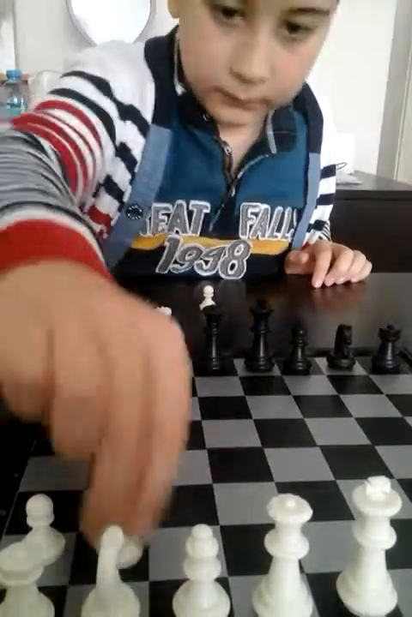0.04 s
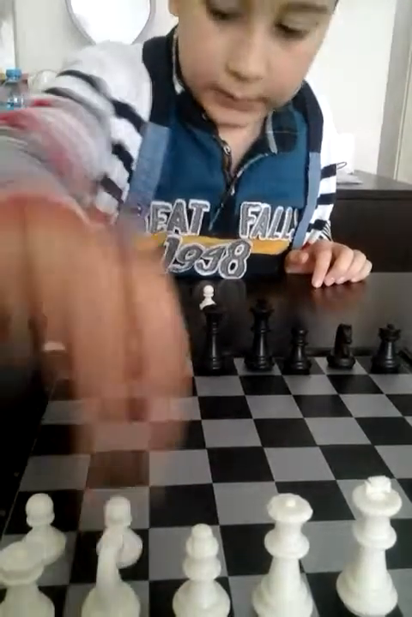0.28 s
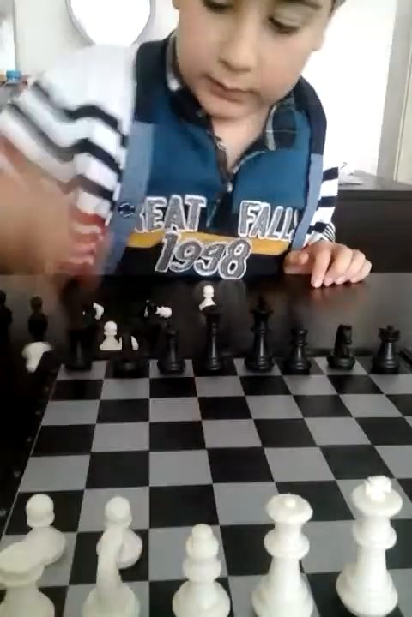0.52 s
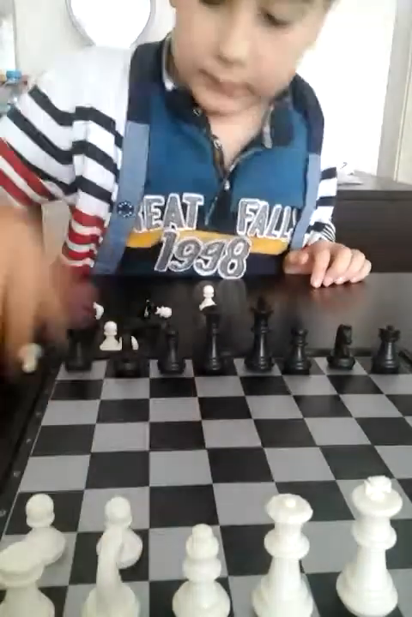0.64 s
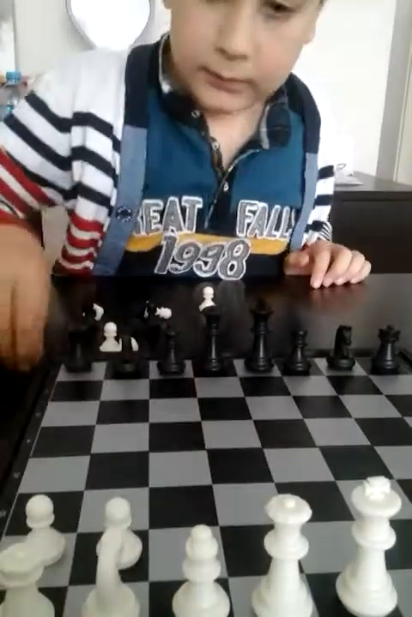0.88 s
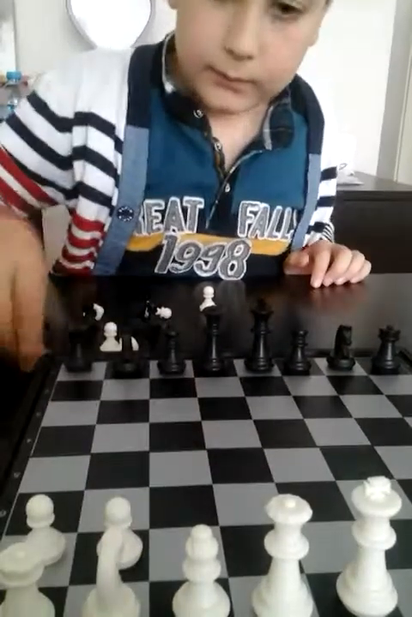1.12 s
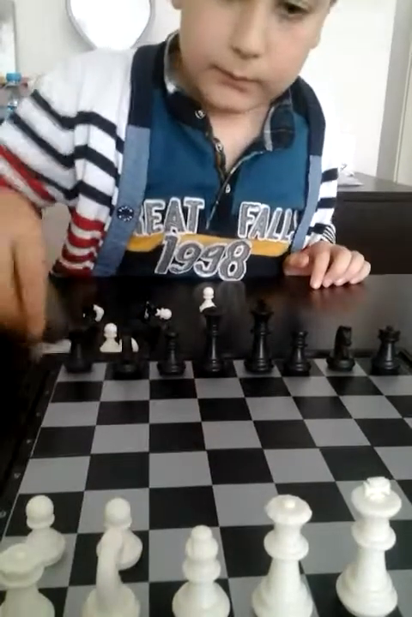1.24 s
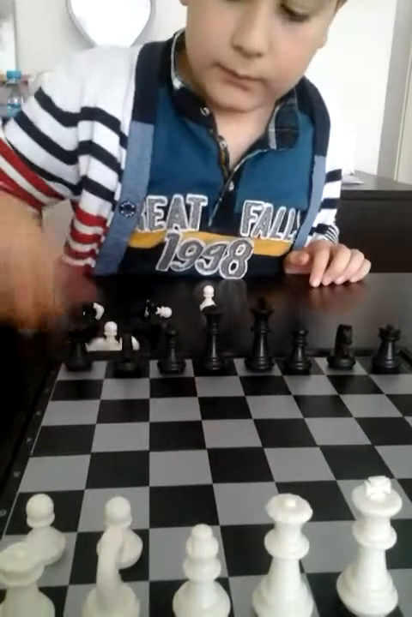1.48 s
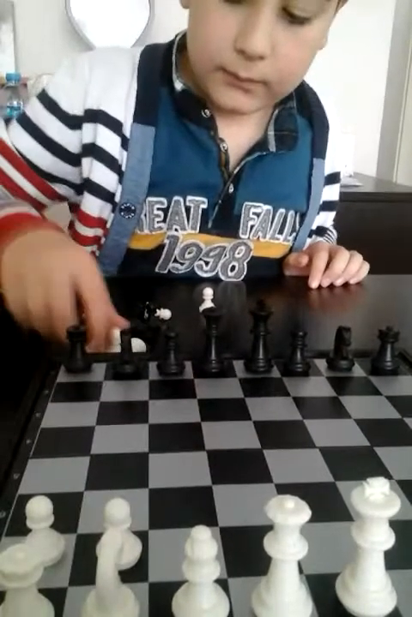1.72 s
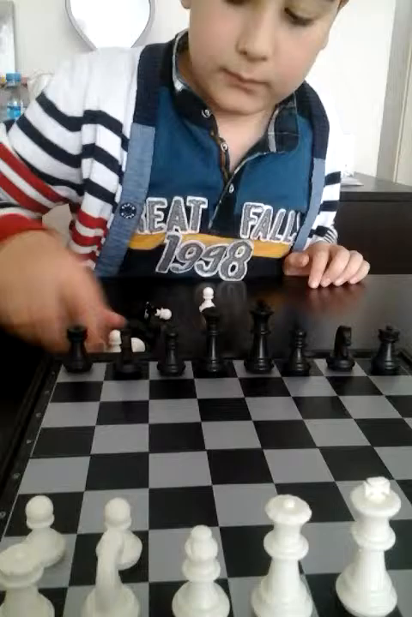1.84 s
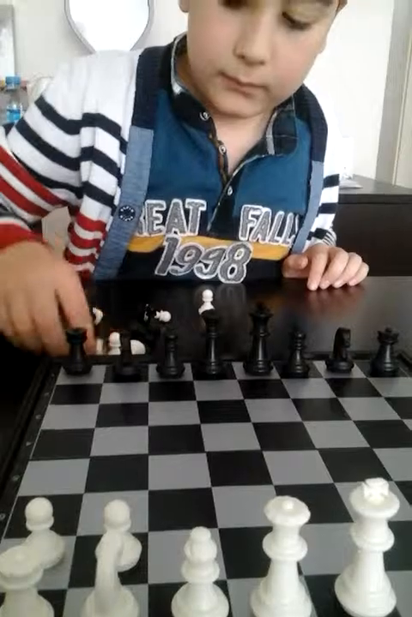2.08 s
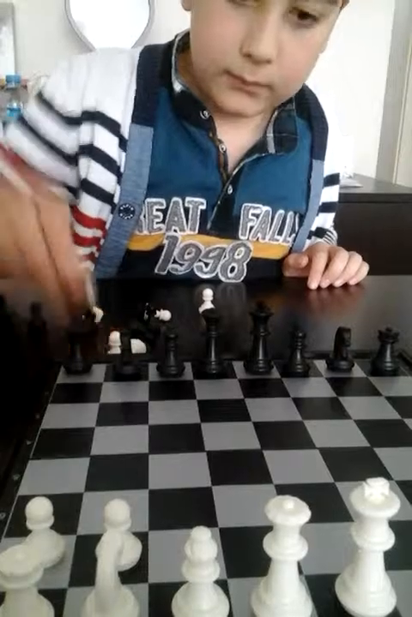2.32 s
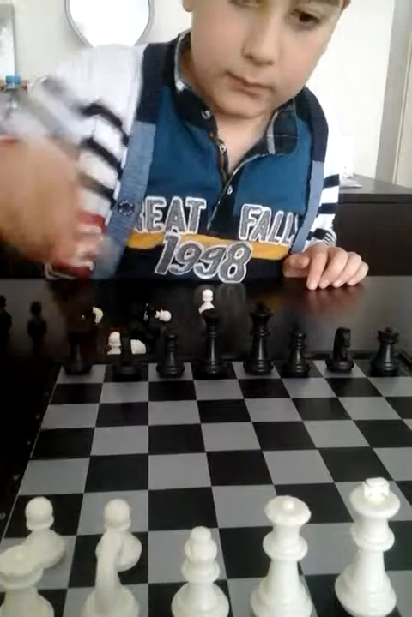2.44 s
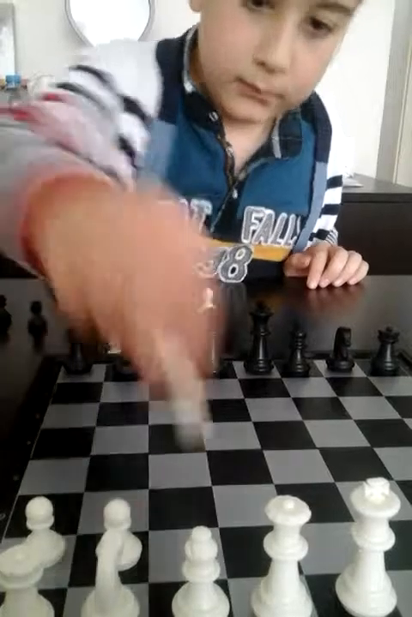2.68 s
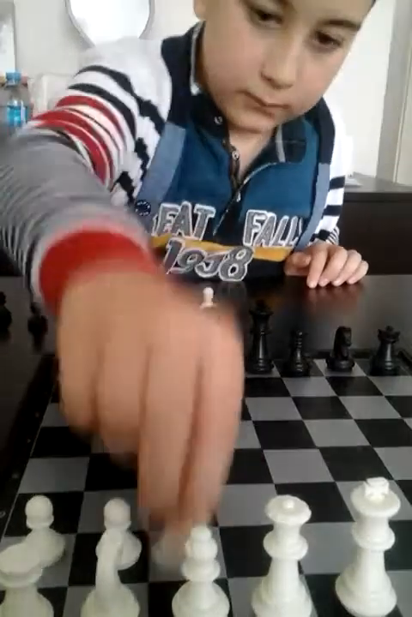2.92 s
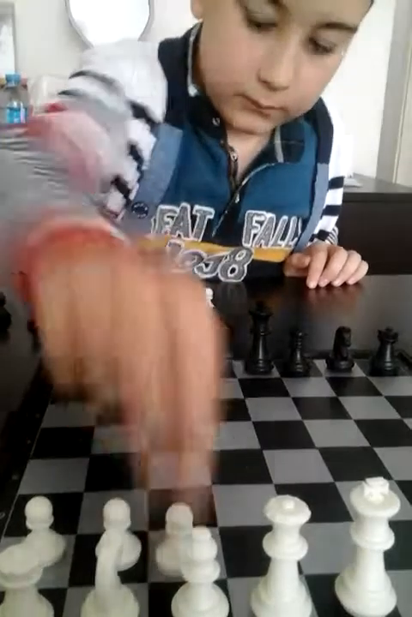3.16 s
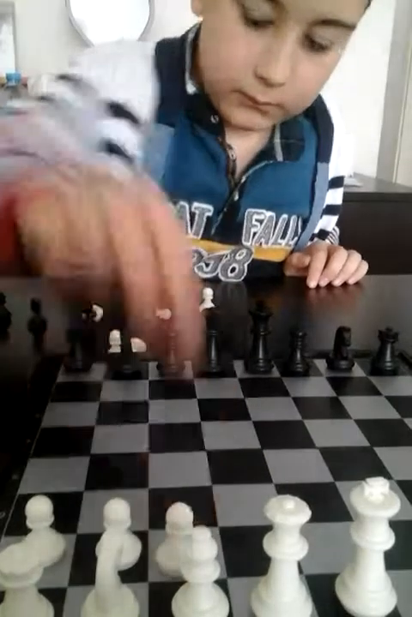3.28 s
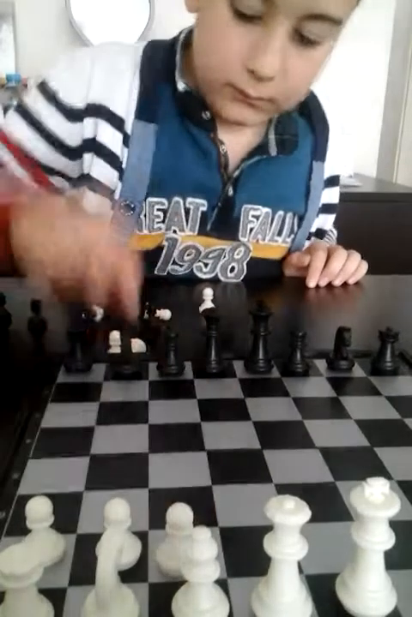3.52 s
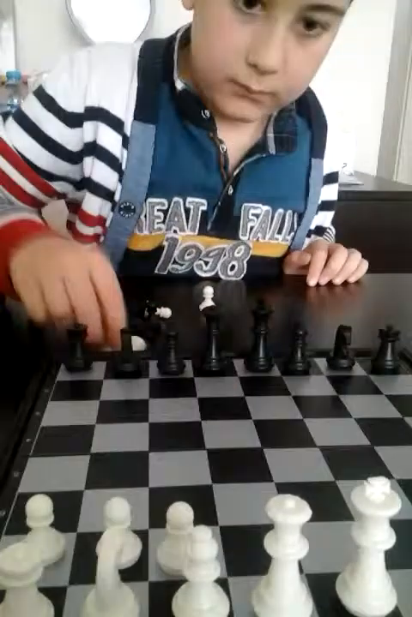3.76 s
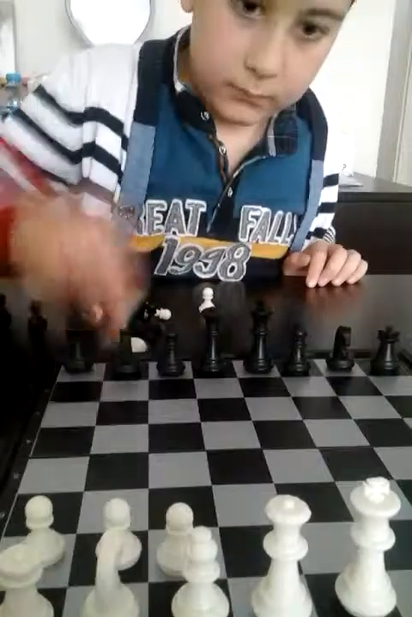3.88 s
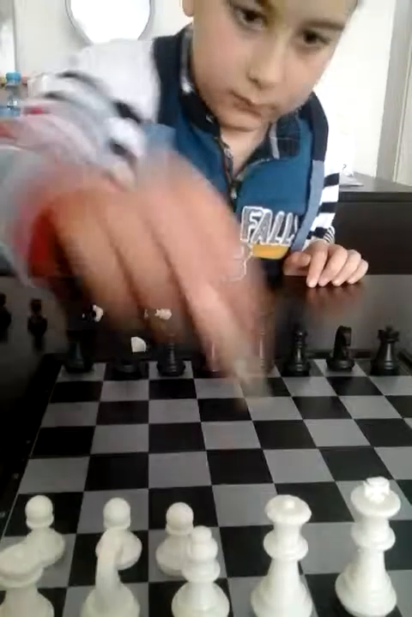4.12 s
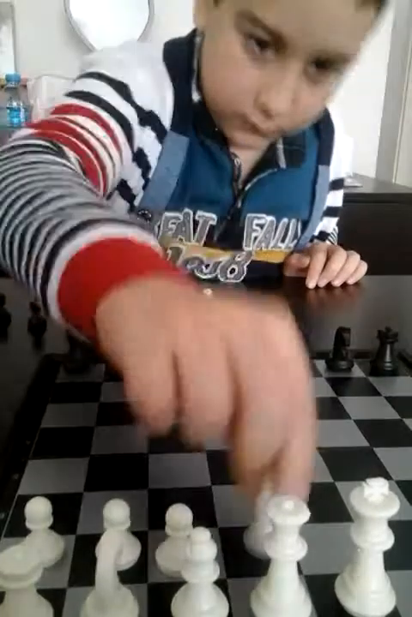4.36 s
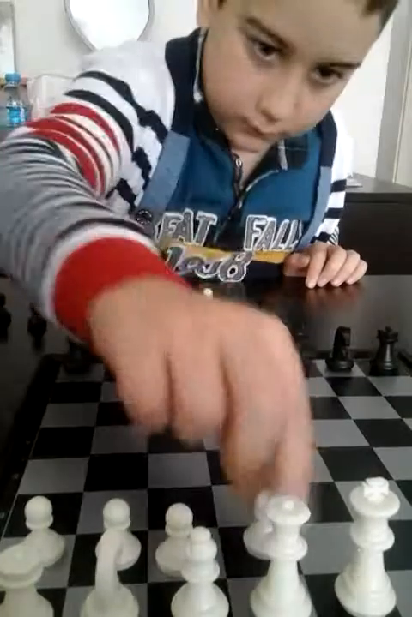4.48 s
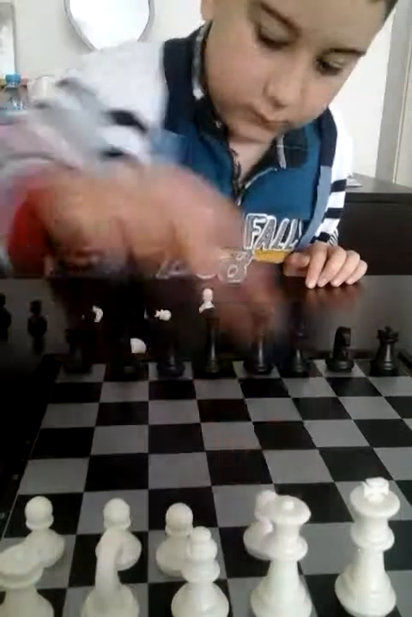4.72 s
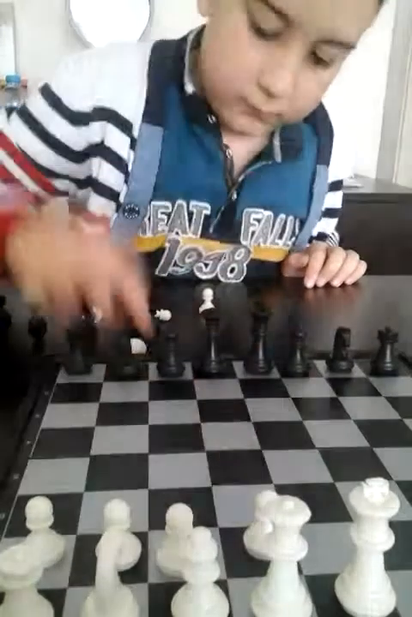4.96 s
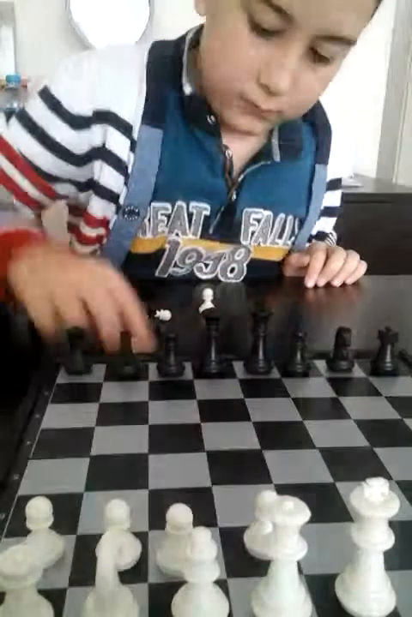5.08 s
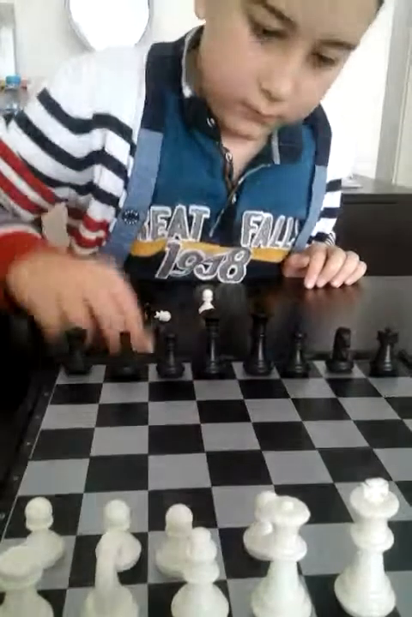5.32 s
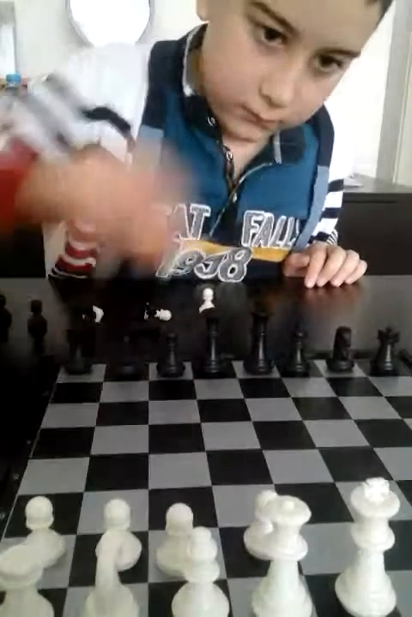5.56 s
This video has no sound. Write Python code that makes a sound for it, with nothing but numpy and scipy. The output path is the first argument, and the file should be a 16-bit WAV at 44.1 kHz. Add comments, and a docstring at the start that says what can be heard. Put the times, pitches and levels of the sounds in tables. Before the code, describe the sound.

Sharp, hollow clicks of plastic chess pieces being placed, with one falling, bouncing and rolling briefly across a table.

```python
"""A small room, a phone's two microphone ports close beside a chessboard on a table.
Hollow plastic pieces are set down on the near squares; every contact rings a piece briefly.
At the far end a hand picks among the spares; one slips, topples, bounces and rolls to rest.
Ceiling and walls answer, over a faint sleeve rustle and a quiet room hum."""
import sys
import numpy as np
from scipy import signal
from scipy.fft import rfft, irfft
from scipy.io import wavfile
from scipy.ndimage import uniform_filter1d

SR = 44100
rng = np.random.default_rng(int(sys.argv[2]) if len(sys.argv) > 2 else 0)


def persist_wave(psi):
    """Save psi, clipped to +-1, as 16-bit WAV."""
    counts = np.round(np.clip(psi, -1, 1) * 32767).astype(np.int16)
    wavfile.write(sys.argv[1], SR, np.atleast_2d(counts).T)


N = 246871
T = np.arange(N) / SR
SIDES = np.array([[.5], [-.5]])  # shares a left-minus-right difference between the channels

# broad colour of a contact between its resonances, near and far: frequency_hz, level_db
NEAR_CRACK = [(100, -31), (350, 1.5), (700, -4.5), (1500, 3), (3000, -5), (5800, -10.5), (7000, -15.5),
              (12000, -20.5), (15000, -37)]
FAR_CRACK = [(100, -26.5), (200, -4.5), (400, -2), (800, -2.5), (1250, 6), (2200, 3), (3600, 1.5),
             (5400, -5.5), (6800, -10.5), (8500, -22.5), (12000, -28.5), (15000, -58)]


def placings():
    """Pieces land on their squares right by the microphone; a smaller piece rings higher."""
    # start_s, level_db, bass_db, treble_db, left_minus_right_db, pitch_factor
    landings = [(0.1115, -29, -7, 5, 0.5, 0.98), (0.1243, -37.5, 1, -11, 0.5, 1.06),
                (0.2076, -47, 7, 6.5, 3, 0.88), (.2705, -56.5, -6, 35, 7, 1.1),
                (3.0201, -31.5, 7, 3, 5, 1.06), (3.0374, -31.5, 6.5, 5, -1.5, 1.034),
                (3.0485, -48, 6, -1, -11, 1.33), (4.4732, -29.5, -5, -8.5, 1.5, 1.044)]
    # resonances of a hollow piece: pitch_hz, base_width_hz, level_db
    piece_modes = [(697, 64, 3), (956, 56, 1.5), (1258, 74, 2), (1690, 58, -6), (2210, 250, -6),
                   (3380, 170, -8.5), (4110, 260, -7), (5200, 160, -4.5), (8150, 190, -17),
                   (12150, 400, -14)]
    out = np.zeros((2, N))
    for start_s, level_db, bass_db, treble_db, pan_db, pitch in landings:
        modes = np.array(piece_modes) * [pitch, 1, 1]
        click = contact(modes, NEAR_CRACK, crack_db=-6, contact_s=0.0021, damping=2.1,
                        bass_db=bass_db, treble_db=treble_db)
        add(out, start_s, click * undb(level_db + pan_db * SIDES))
    return out


def ticks():
    """On the near squares a piece brushes its neighbour and rings with a short tick."""
    # start_s, level_db, pitch_hz, treble_db
    brushes = [(0.334, -41, 2100, 5.5), (3.16, -47.5, 1860, -12), (3.2003, -43, 1720, 1.5)]
    # resonances of a tick: pitch_multiple, base_width_hz, level_db
    tick_modes = [(1, 100, 6), (1.7, 100, -4), (2.5, 140, -15), (3.45, 90, -14)]
    out = np.zeros(N)
    for start_s, level_db, pitch_hz, treble_db in brushes:
        modes = np.array(tick_modes) * [pitch_hz, 1, 1]
        tick = contact(modes, NEAR_CRACK, crack_db=-8, contact_s=0.00059, damping=5.2,
                       treble_db=treble_db)
        add(out, start_s, tick * undb(level_db))
    return out


def knocks(free_fall_db=-14):
    """Pieces knock on the far end of the table, loudest where one falls and bounces."""
    # start_s, level_db, treble_db
    blows = [(.877, -36, 2.5), (1.0299, -31.5, 4.5), (1.2913, -22.5, 5.5), (1.3092, -15.5, 0.5),
             (1.3668, -15.5, -1), (1.401, -18.5, 12), (1.4305, -16, 2.5), (1.4793, -19.5, -1.5),
             (1.4811, -15.5, 9), (1.522, -18, -1), (1.545, -29, 6), (1.5636, -21.5, -0.5),
             (1.5964, -18.5, 1.5), (2.110, -44, -4), (2.1506, -42.5, 6), (2.163, -40, 1.5),
             (3.889, -53, -2), (5.235, -44.5, -7)]
    out = np.zeros(N)
    for start_s, level_db, treble_db in blows:
        # guided by the fingers, a piece lands softer and flatter, with more bass than in free fall
        bass_db = 0.2 * (free_fall_db - level_db)
        add(out, start_s, far_contact(bass_db, treble_db) * undb(level_db))
    return out


def rolling(length_s=.268, rock_hz=33.02, fade_db_per_s=43, dulling_db_per_s=41.5):
    """The fallen piece rolls on its side, its rim bumping, quieter and duller as it slows."""
    out = np.zeros(N)
    add(out, 0, chatter(length_s, bass_db=0, treble_db=0))
    gaps_s = (1 + 0.29 * rng.uniform(-1, 1, 14)) / rock_hz
    for start_s in np.cumsum(gaps_s):
        add(out, start_s, far_contact() * undb(4.5) * (start_s < length_s))
    treble = out - colour(out, [(1250, 0), (4500, -20)])
    out += treble * (undb(2 - dulling_db_per_s * T) - 1)
    return out * undb(-31.5 - fade_db_per_s * T)


def shuffles():
    """Fingers shuffle a piece over the far end; each scrape swells, holds and is let go."""
    # start_s, length_s, level_db
    moves = [(.866, 0.039, -41), (2.026, 0.089, -67.5), (2.106, 0.084, -45.5), (3.797, 0.079, -58.5),
             (4.979, 0.047, -64.5), (5.21, 0.043, -51)]
    out = np.zeros(N)
    for start_s, length_s, level_db in moves:
        scrape = chatter(length_s, bass_db=1, treble_db=-7)
        swell = envelope(T[:len(scrape)], length_s, attack_s=0.0098, release_s=.012)
        add(out, start_s, scrape * swell * undb(level_db))
    return out


def hand_bumps():
    """The hand bumps the far end of the table, which answers with a dull thud."""
    # start_s, level_db
    bumps = [(.797, -35), (0.81, -42.5), (0.843, -45.5), (0.861, -39.5)]
    # resonances of the table: pitch_hz, base_width_hz, level_db
    table_modes = [(214.8, 28, 5), (297.4, 93, 1.5), (485.5, 290, -4), (777, 201.5, -13.5),
                   (1300, 248, -14.5)]
    out = np.zeros(N)
    for start_s, level_db in bumps:
        thud = contact(table_modes, FAR_CRACK, crack_db=-25, contact_s=0.0035, damping=1.84)
        add(out, start_s, thud * undb(level_db))
    return out


def slide(start_s=1.1605, tip_s=1.305, level_db=-43.5):
    """A far piece slides with a thin hiss that swells and holds until it tips over."""
    # the hiss: frequency_hz, level_db
    spectrum = [(1000, -17.5), (4000, -12), (5400, -6.5), (6000, 1), (6500, -4.5), (7200, -20),
                (12000, -24.5), (15000, -36)]
    swell = envelope(T - start_s, tip_s - start_s, attack_s=.085, release_s=0.014)
    return noise(spectrum)[0] * undb(level_db) * swell


def chatter(length_s, bass_db, treble_db, rate_hz=450, scatter_db=5):
    """A rim chatters over the table in dense, uneven contacts; rms one while it moves."""
    size = int(length_s * SR)
    spots = 3  # each spot on the rim has its own sound
    touches = rng.random((spots, N)) < rate_hz / spots / SR
    strengths = undb(scatter_db * rng.standard_normal((spots, N))) * rng.choice([-1, 1], (spots, N))
    sound = sum(signal.fftconvolve(spot[:size], far_contact(bass_db, treble_db))
                for spot in touches * strengths)
    return sound / (sound[:size].std() + 1e-9)


def far_contact(bass_db=0, treble_db=0):
    """A piece meets the bare table top; the spot that is struck shifts the whole ring a little."""
    # resonances of a piece on the table: pitch_hz, base_width_hz, level_db
    piece_modes = [(1134, 170, -7), (1242, 120, -1), (1440, 150, -14), (1703, 76, -1), (2817, 205, -0.5),
                   (3620, 200, -0.5), (3680, 113, -8), (4350, 67, -8), (5300, 300, -6), (6140, 140, -14),
                   (7630, 110, -16.5)]
    modes = np.array(piece_modes) * [1 + 0.028 * rng.standard_normal(), 1, 1]
    return contact(modes, FAR_CRACK, crack_db=-9.5, contact_s=0.003, damping=1.22,
                   bass_db=bass_db, treble_db=treble_db)


def contact(modes, crack_colour, crack_db, contact_s, damping, bass_db=0, treble_db=0):
    """A brief, rough blow rings a body; damping widens its modes. Rms one over the first 5 ms."""
    size = 4096
    f = np.fft.rfftfreq(size, 1 / SR)
    hz, width, db = np.transpose(modes)[:, :, None]
    hz = hz * (1 + 0.029 * rng.standard_normal(hz.shape))  # no two landings ring quite alike
    resonances = np.sum(undb(db) ** 2 / (1 + (2 * (f - hz) / (width * damping)) ** 2) ** 2, axis=0)
    body = np.sqrt(resonances + undb(crack_db + lookup(crack_colour, f)) ** 2)
    # a flat landing brings out the bass, a hard edge the treble
    landing = undb(lookup([(650, bass_db), (1250, 0.0037), (4500, treble_db)], f))
    # the blow is irregular in time but feeds all bands evenly
    blow = rfft(rng.standard_normal(size) * np.exp(-(T[:size] / contact_s) ** 2))
    unevenness = np.sqrt(uniform_filter1d(np.abs(blow) ** 2, size=25))
    # a causal response: nothing rings before the blow
    cepstrum = irfft(np.log(body * landing / unevenness))
    causal = 1 + np.sign(np.fft.fftfreq(size))
    sound = irfft(blow * np.exp(rfft(cepstrum * causal)))
    return sound / sound[:SR // 200].std()


def room(tail_db, ceiling_db, ceiling_s, early_db, early_s, modes_db, alike_hz=900):
    """The room's answer: nearby surfaces, the ceiling echo, a diffuse tail and faint resonances."""
    # time to die away by 60 dB: frequency_hz, decay_s
    decay_times = [(150, 0.616), (500, 0.5), (1300, 0.35), (4000, 0.41), (7000, 0.37), (14000, 0.12)]
    # strongest room resonances: pitch_hz, level_db
    room_modes = [(1211, -51.5), (1362, -42), (1459, -48), (1809, -40), (2024, -57.5), (2848, -49),
                  (3262, -45.5), (3408, -47), (3488, -43.5), (3585, -49), (3903, -58.5), (4290, -51)]
    t = T[:SR * 3 // 4]
    f = np.fft.rfftfreq(len(t), 1 / SR)
    white = rng.standard_normal((2, len(t)))
    tail = ringing = 0
    for hz in np.geomspace(125, 16000, 8):
        octave = lookup([(hz / 2, 0), (hz, 1), (hz * 2, 0)], f)
        # long waves reach both ports by the same paths
        paths = unit(white + white[::-1] / (1 + hz / alike_hz))
        tail += irfft(rfft(paths) * octave, len(t)) * undb(-60 * t / lookup(decay_times, hz))
    for hz, db in room_modes:
        tone = np.sin(2 * np.pi * (hz * t + rng.random((2, 1))))
        ringing += tone * undb(db - 60 * t / lookup(decay_times, hz))
    early = rng.standard_normal((2, len(t))) * np.exp(-t / early_s) * (t > .002)
    ceiling = rng.standard_normal(len(t)) * np.exp(-np.abs(t - ceiling_s) / .0005)
    tail *= np.minimum(t / 0.01, 1)
    layers = [(tail, tail_db), (early, early_db), (ceiling, ceiling_db), (ringing, modes_db)]
    return sum(unit(x) * undb(db) for x, db in layers) / np.sqrt(len(t))


def at_microphone(source, response):
    """The direct wave meets the two ports out of phase; the room follows."""
    # frequency_hz, left_minus_right_rad
    port_phase = [(300, 2.8), (1000, 1.86), (3000, 2.04), (5000, 1.3), (7000, 1.52)]
    turn = np.exp(1j * lookup(port_phase, np.fft.rfftfreq(N, 1 / SR)) * SIDES)
    direct = irfft(rfft(source) * turn, N)
    return direct + signal.fftconvolve(direct, response, axes=-1)[:, :N]


def sleeve(level_db=-74, waver_db=4, waver_hz=9):
    """A sleeve rustles faintly and unevenly as the arm reaches to and fro."""
    # the cloth: frequency_hz, level_db
    spectrum = [(200, -27.5), (350, 0.5), (700, 0), (1200, -5), (2200, -5), (6000, -17.5), (15000, -29.5)]
    steps = rng.standard_normal(200)
    waver = np.interp(T * waver_hz, np.arange(len(steps)), steps)
    return noise(spectrum) * undb(level_db + waver_db * waver)


def hum(opposed=0.32, gain_db=-57.5):
    """Steady room rumble and microphone hiss; the low mids reach the ports partly in opposite phase."""
    # frequency_hz, level_db
    spectrum = [(15, -45), (25, -12), (112, -3), (196, -5.5), (224, -7.5), (278, -8.5), (344, -11.5),
                (383, -11.5), (415, -15.5), (558, -16), (811, -20), (1240, -19.5), (2070, -28),
                (13800, -31), (15000, -35.5)]
    # frequency_hz, left_minus_right_db
    balance = [(60, 6.5), (200, -3.5), (400, -2.5), (1000, -5.5), (2400, -2.5), (6000, -1.5)]
    air = noise(spectrum)
    crossed = colour(air[::-1], [(50, -15.5), (150, -8), (300, -6.5), (650, -12), (1400, -36)])
    return colour(air - opposed * crossed, balance, SIDES) * undb(gain_db)


def highpass(x, hz):
    """Small light objects radiate little bass."""
    return signal.sosfilt(signal.butter(3, hz, "high", fs=SR, output="sos"), x)


def envelope(t, length_s, attack_s, release_s):
    """Rise, hold and fall within a length of time."""
    return np.clip(np.minimum(t / attack_s, (length_s - t) / release_s), 0, 1)


def undb(db):
    """Decibels to gain."""
    return 10 ** (np.asarray(db) / 20)


def unit(x):
    """Scale to an rms of one."""
    return x / np.sqrt(np.mean(x ** 2))


def lookup(points, hz):
    """Read (frequency_hz, value) points on a log-frequency axis."""
    f, value = np.transpose(points)
    return np.interp(np.log(hz + 1), np.log(f), value)


def colour(x, points, share=1):
    """Filter by (frequency_hz, gain_db) points; share scales the dB for each channel."""
    size = x.shape[-1]
    return irfft(rfft(x) * undb(share * lookup(points, np.fft.rfftfreq(size, 1 / SR))), size)


def noise(points):
    """Coloured stereo noise of rms one."""
    return unit(colour(rng.standard_normal((2, N)), points))


def add(track, start_s, sound):
    """Mix a sound in at a time."""
    start = int(start_s * SR)
    track[..., start:start + sound.shape[-1]] += sound[..., :N - start]


def scene():
    """The board close up, the far end with more room on it; both favour the right port."""
    # frequency_hz, left_minus_right_db
    port_balance = [(250, -5.5), (600, -8), (1150, -10.5), (2200, -5), (4500, -6.5), (7500, 1), (11000, 0)]
    board = placings() + ticks()
    near_room = room(tail_db=-8, ceiling_db=-31, ceiling_s=0.0094,
                     early_db=-9.5, early_s=0.0058, modes_db=-34)
    spares = knocks()
    add(spares, start_s=1.6, sound=rolling())
    spares += shuffles() + hand_bumps() + slide()
    far_room = room(tail_db=-6, ceiling_db=-14.5, ceiling_s=.013,
                    early_db=-9.5, early_s=0.008, modes_db=-24.5)
    near = at_microphone(highpass(board, hz=450), near_room)
    far = at_microphone(highpass(spares, hz=220), far_room)
    return colour(near + far + sleeve(), port_balance, SIDES) + hum()


def record(dry):
    """The phone cuts the top above 14.8 kHz."""
    return signal.sosfilt(signal.ellip(10, .2, 70, 14800, fs=SR, output="sos"), dry)


dry = scene()
out = record(dry)
persist_wave(out)
```